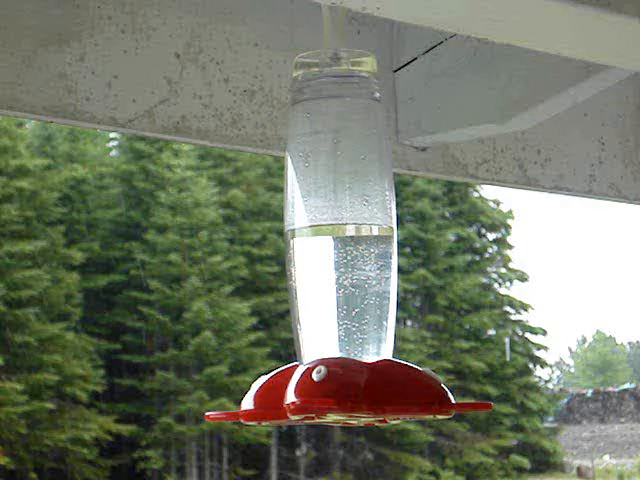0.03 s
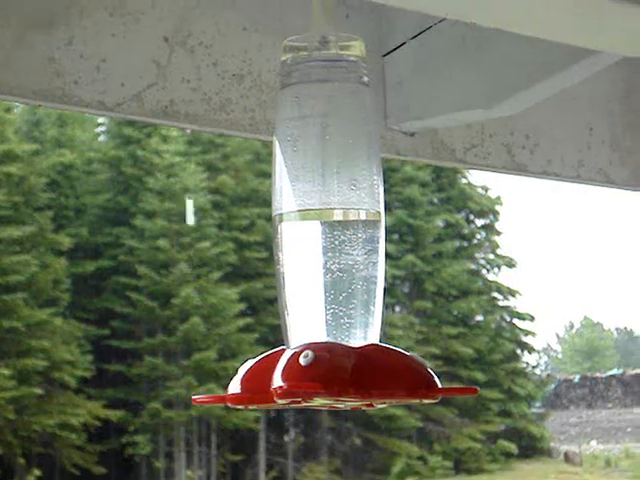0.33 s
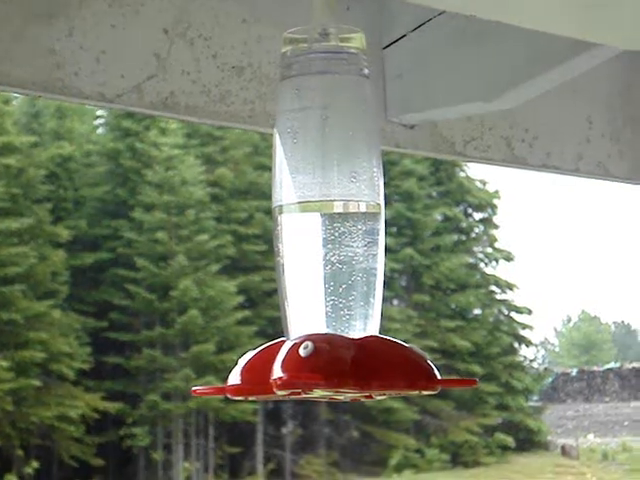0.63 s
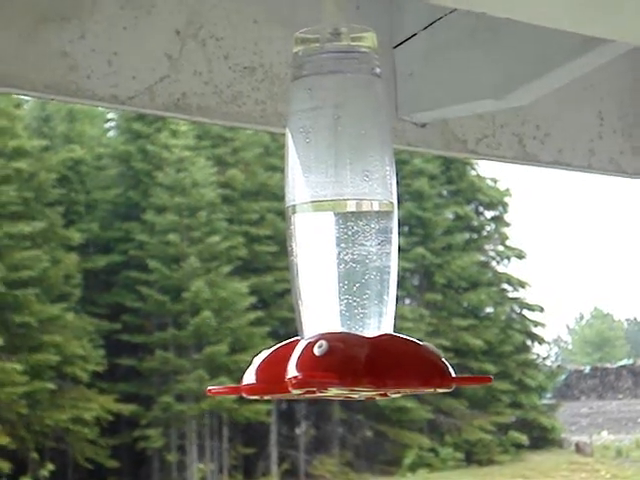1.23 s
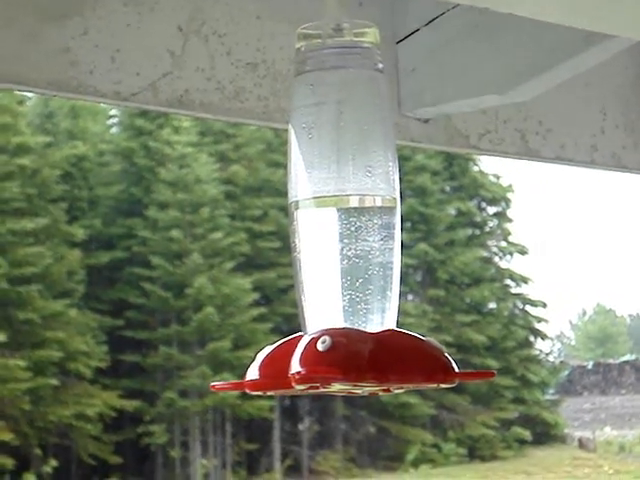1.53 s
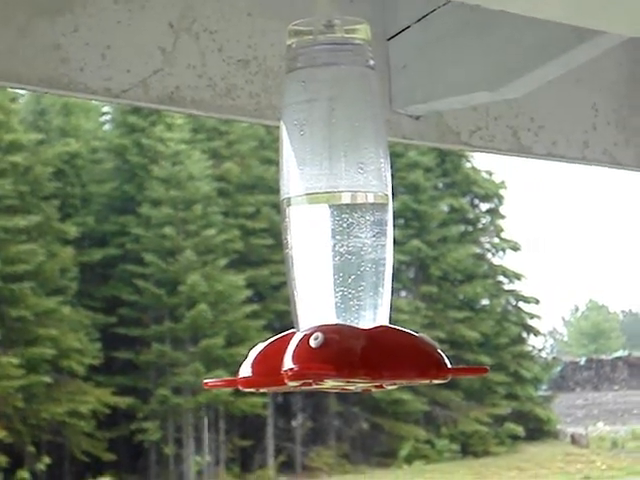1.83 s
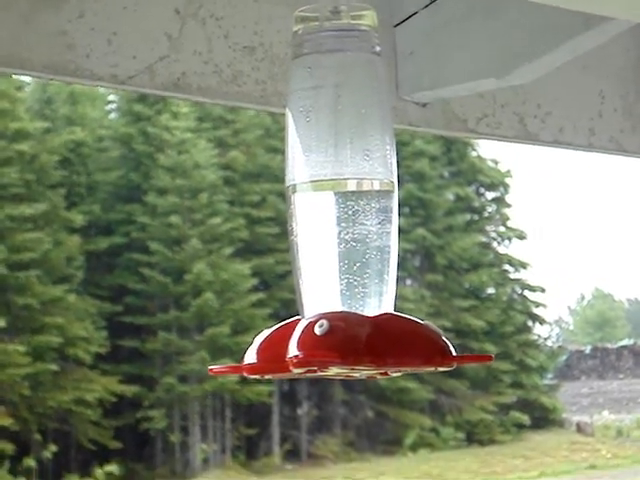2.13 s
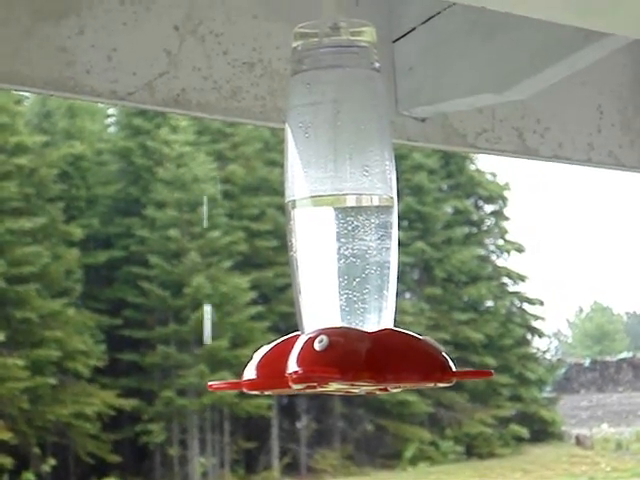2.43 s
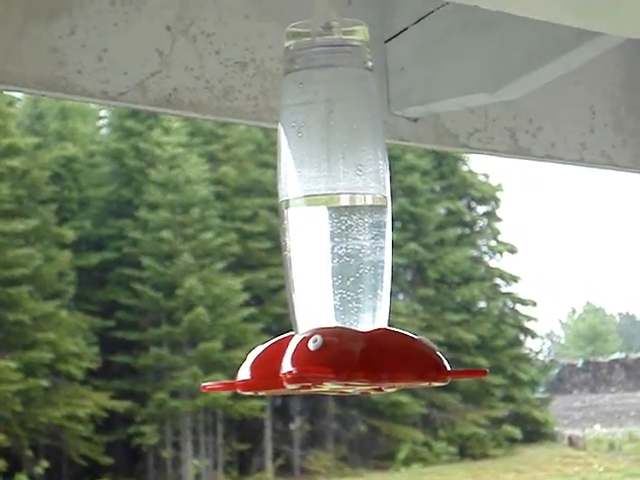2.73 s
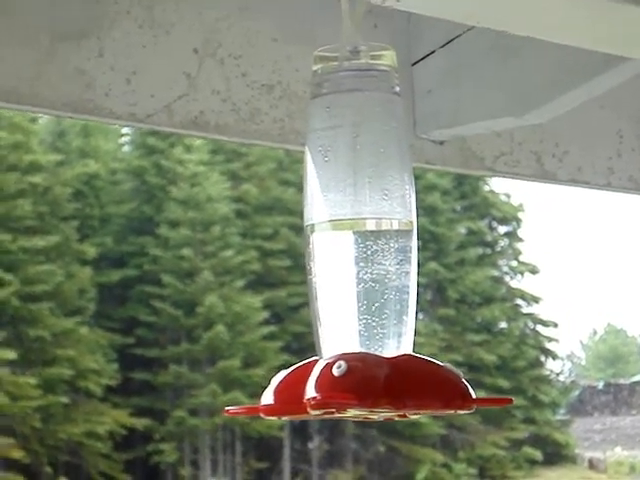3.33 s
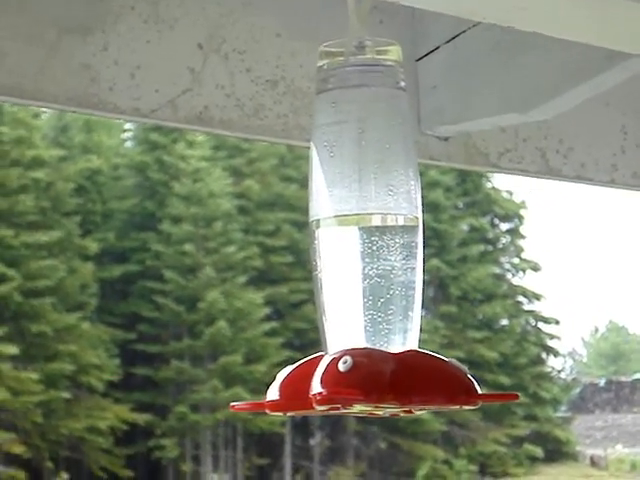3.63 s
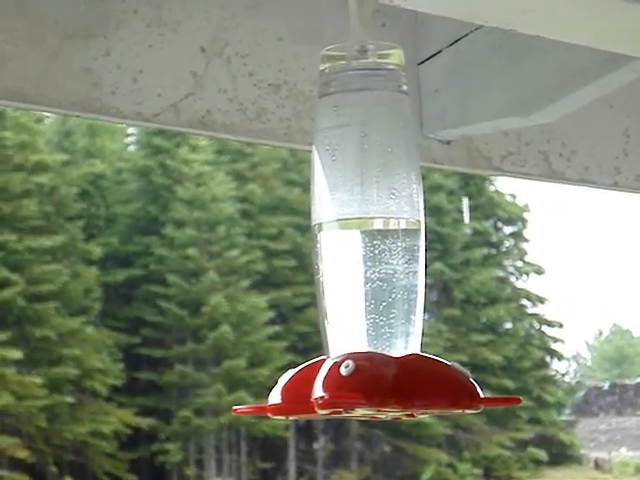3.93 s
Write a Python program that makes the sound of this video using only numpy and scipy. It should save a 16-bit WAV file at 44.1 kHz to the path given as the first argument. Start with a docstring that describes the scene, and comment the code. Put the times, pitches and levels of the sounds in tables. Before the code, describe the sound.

Steady light rain with drops splashing from the eaves and high, thin birdsong behind.

```python
"""Light rain from a porch

Rain washes over a conifer wood. Drops from the eaves splash on the ground and plink in water,
and one ticks on something hard close by. A high buzzing song, probably a bird, rises among the
trees at the start; thin whistles follow. A hand knocks lightly on a camera as the sound opens."""
import sys
import numpy as np
from scipy import signal
from scipy.fft import rfft, irfft
from scipy.io import wavfile
from scipy.ndimage import uniform_filter1d

SR = 44100
rng = np.random.default_rng(int(sys.argv[2]) if len(sys.argv) > 2 else 0)


def put_to_file(sound):
    """Save the sound as 16-bit audio at rate SR, in the file named by the first command-line argument."""
    columns = np.atleast_2d(sound).T  # one column per channel
    safe = np.clip(columns, -1, 1)
    whole_steps = np.round(safe * 32767)
    wavfile.write(sys.argv[1], SR, whole_steps.astype(np.int16))


N = 176400

# Tone of the rain wash. Each row: frequency in Hz, relative level in dB.
RAIN_EQ = [(15, -62), (25, -12.5), (200, -1.5), (270, -1), (301, -1), (476, -2), (840, -2.5), (988, -4.5),
           (2350, -7.5), (5000, -10), (5430, -9.5), (6050, -9.5), (8140, -9), (9840, -17.5), (10700, -41.5),
           (14800, -34.5), (16000, -31)]
# Splashes under the eaves. Each row: start in seconds, then body, spray and slap in relative dB.
SPLASH_HITS = [(0.308, -45.5, -51, -68), (0.469, -48, -53.5, -51.5), (0.835, -52.5, -59, -71),
               (1.0056, -48, -46.5, -53), (1.213, -55, -55, -50.5), (1.453, -74, -54.5, -63),
               (1.613, -53, -52.5, -64), (1.6904, -47.5, -49.5, -54), (1.772, -54, -56, -52),
               (2.256, -58, -51, -66), (2.378, -58, -46.5, -69), (2.661, -56, -48.5, -65),
               (3.058, -52.5, -48, -70), (3.262, -51.5, -51, -55), (3.423, -51.5, -58, -54),
               (3.579, -56, -50, -56), (3.593, -64, -52, -72), (3.7506, -49.5, -49.5, -53)]
# A splash's mid body, bright spray and low slap. Each row: frequency in Hz, relative level in dB.
BODY_EQ = [(700, -29), (1800, -7), (3400, -0.5), (5200, -4.5), (9000, -20)]
SPRAY_EQ = [(2500, -42), (5500, 2), (7900, 10), (9400, 1.5), (10400, -12), (15500, -32)]
SLAP_EQ = [(60, -7), (300, 1), (700, -7), (1600, -16), (3000, -32)]
# Drops landing in water. Each row: start in seconds, starting pitch in Hz, peak level in dB.
PLINK_HITS = [(1.213, 1650, -42), (1.618, 6500, -38.5), (1.693, 8230, -40), (2.545, 1660, -39),
              (3.4236, 3380, -38), (3.753, 3440, -42.5)]
# Modes of the hard surface. Each row: frequency in Hz, relative level in dB, T60 in seconds.
SURFACE_MODES = [(1130, -4.5, 0.012), (1600, -7.5, 0.02), (2155, -15, 0.023), (2620, 2, 0.012),
                 (3210, 1.5, 0.0058), (4090, -2, 0.011), (5060, -5.5, 0.006), (5600, -22, .008),
                 (7050, -23, 0.015), (9000, -15, 0.018), (11270, -27, .007), (14500, -13, .007)]
# Contour of the buzzing song. Each row: time in seconds, pitch in Hz, level in dB.
SONG_CONTOUR = [(.12, 4400, -44.5), (0.251, 4370, -41.5), (.295, 5163, -41), (0.357, 5300, -46.5),
                (0.403, 4370, -46.5), (0.471, 4367, -42), (.535, 4990, -42.5), (.595, 5540, -39.5),
                (0.654, 5986, -40), (0.762, 6020, -44), (.84, 6100, -52.5), (0.919, 6050, -52),
                (1.031, 5900, -76)]
# Fizz around the song. Each row: frequency in Hz, relative level in dB.
FIZZ_EQ = [(3000, -2), (5000, 12.5), (8500, -7), (10700, -6), (12000, -8), (13500, -5), (16000, -19)]
# Thin whistles. Each row: start and length in seconds, first and last pitch in Hz, level in dB.
WHISTLE_NOTES = [(.15, 0.25, 5450, 5450, -46), (.42, 0.228, 5470, 5620, -48), (2.05, 0.1, 2720, 2680, -63),
                 (2.31, 0.055, 5550, 5500, -56.5), (2.47, 0.088, 5500, 5500, -57.5),
                 (2.591, 0.052, 5550, 5500, -55), (2.715, 0.048, 4750, 4400, -54),
                 (2.795, 0.044, 5600, 5400, -51.5), (2.87, 0.22, 7850, 8530, -55.5),
                 (2.893, 0.13, 5600, 5150, -55.5), (3.017, 0.086, 7400, 6750, -55.5),
                 (3.028, 0.048, 4550, 4380, -55), (3.109, 0.039, 6100, 6050, -52.5),
                 (3.117, 0.062, 5600, 5230, -51.5), (3.246, 0.16, 8000, 8410, -51),
                 (3.435, 0.12, 6750, 6170, -55.5), (3.579, 0.035, 8950, 8700, -51),
                 (3.634, 0.15, 9250, 9400, -59), (3.792, .06, 7100, 6600, -55)]
# Hand knocks. Each row: start in seconds, click level in dB, click brightness in Hz,
# click decay in seconds, thump level in dB.
HAND_KNOCKS = [(0.2656, -30.5, 1490, 0.005, -25.5), (0.2758, -27.5, 1900, 0.0022, -37)]

RAIN_DB, RAIN_SWELL_DB, PATTER_DB = -49, .45, -60.5
SPLASH_ATTACK_S, SPLASH_DECAY_S = 0.0005, 0.015
PLINK_T60_S, PLINK_RISE_PER_S = 0.026, 21
TICK_S, TICK_RING_DB, TICK_CRACK_DB = 3.2074, -20.5, -29
BUZZ_HZ, BUZZ_SWING_HZ, BUZZ_SCATTER_HZ, FIZZ_DB = 114.5, 298, 207.5, -9
WHISTLE_WAVER_HZ, WHISTLE_EDGE_S = 129.6, 0.0051
THUMP_HZ, THUMP_DECAY_S, SHAKE_DB, SHAKE_DECAY_S = 260, 0.0018, -59.5, 0.074
WOOD_T60_S = 0.68
OPEN_S, MIRROR_DB, MIRROR_HZ, TOP_HZ = 0.1682, -18, 19950, 15900


def undb(db):
    """Decibels to gain."""
    return 10 ** (np.asarray(db) / 20)


def unit(x):
    """Scale to rms 1."""
    return x / np.sqrt(np.mean(x ** 2) + 1e-20)


def colour(x, eq):
    """Shape with an EQ curve of (Hz, dB) points, then scale to rms 1."""
    hz, db = np.array(eq, float).T
    f = np.maximum(np.fft.rfftfreq(len(x), 1 / SR), 1)
    gain = undb(np.interp(np.log(f), np.log(hz), db))
    return unit(irfft(rfft(x) * gain, len(x)))


def wander(rate_hz):
    """Smooth random modulation at rms 1."""
    hold = max(int(SR / rate_hz), 1)
    steps = np.repeat(rng.standard_normal(N // hold + 1), hold)
    return unit(uniform_filter1d(uniform_filter1d(steps, hold), hold)[:N])


def droplets(per_s, spread_db, size):
    """Random impacts of uneven strength."""
    hits = (rng.random(size) < per_s / SR) * rng.choice([-1, 1], size)
    return hits * undb(spread_db * np.minimum(rng.exponential(size=size), 5))


def add(out, start, x):
    """Mix a short sound in at its start in seconds."""
    i = max(int(start * SR), 0)
    out[i:i + len(x)] += x[:max(N - i, 0)]


def rain():
    """Far drops blur into a wash that swells and flickers a little; nearer drops patter on top."""
    wash = colour(rng.standard_normal(N), RAIN_EQ)
    wash *= undb(RAIN_DB + RAIN_SWELL_DB * (wander(3.25) + wander(45)))
    patter = colour(droplets(per_s=1200, spread_db=5, size=N),
                    [(100, -33), (400, 2.5), (2000, -9.5), (8300, -3.5), (10400, -9), (16000, -14)])
    return wash + undb(PATTER_DB) * patter


def splashes(size=8192):
    """Each drop from the eaves slaps the ground and bursts into droplets."""
    out, t = np.zeros(N), np.arange(size) / SR
    envelope = (1 - np.exp(-t / SPLASH_ATTACK_S)) * np.exp(-t / SPLASH_DECAY_S)
    for start, *levels in SPLASH_HITS:
        burst = sum(undb(db) * colour(droplets(per_s=4200, spread_db=4.4, size=size), eq)
                    for db, eq in zip(levels, (BODY_EQ, SPRAY_EQ, SLAP_EQ)))
        add(out, start, 1.75 * burst * envelope)
    return out


def plinks(size=4096):
    """Drops land in water, where small bubbles ring and rise in pitch."""
    out, t = np.zeros(N), np.arange(size) / SR
    envelope = np.exp(-np.log(1000) * t / PLINK_T60_S)
    for start, hz, db in PLINK_HITS:
        bubble = np.sin(2 * np.pi * hz * (t + PLINK_RISE_PER_S * t ** 2 / 2))
        add(out, start, undb(db) * bubble * envelope)
    return out


def tick(size=4096):
    """A drop hits something hard and near: a sharp crack and a tightly damped ring."""
    out, t = np.zeros(N), np.arange(size) / SR
    ring = sum((-1) ** k * undb(db) * np.sin(2 * np.pi * hz * t) * np.exp(-np.log(1000) * t / t60)
               for k, (hz, db, t60) in enumerate(SURFACE_MODES))
    crack = colour(rng.standard_normal(size), [(600, -22), (1200, 3), (5000, 4), (15000, -19)])
    crack *= np.exp(-t / 0.0021)
    low_cut = signal.butter(3, 850, "high", fs=SR, output="sos")
    add(out, TICK_S, signal.sosfilt(low_cut, undb(TICK_RING_DB) * ring + undb(TICK_CRACK_DB) * crack))
    return out


def song(t):
    """A high tone swept rapidly up and down with a faint fizz, smeared to a hiss by the trees."""
    times, hz, db = np.array(SONG_CONTOUR).T
    buzz = np.sin(2 * np.pi * np.cumsum(BUZZ_HZ * (1 + 0.17 * wander(40))) / SR)
    pitch = np.interp(t, times, hz) + BUZZ_SWING_HZ * buzz + BUZZ_SCATTER_HZ * wander(1500)
    tone = np.sqrt(2) * np.sin(2 * np.pi * np.cumsum(pitch) / SR)
    fizz = undb(FIZZ_DB) * colour(rng.standard_normal(N), FIZZ_EQ)
    envelope = undb(np.interp(t, times, db, left=-120, right=-120) + 1.4 * wander(150))
    return wood_reverb((tone + fizz) * envelope, wet_db=5)


def whistles():
    """Faint bird notes waver and glide among the trees."""
    out, waver = np.zeros(N), WHISTLE_WAVER_HZ * wander(500)
    for start, length, first_hz, last_hz, db in WHISTLE_NOTES:
        t = np.arange(int(length * SR)) / SR
        glide = first_hz + (last_hz - first_hz) * t / length
        pitch = glide + np.roll(waver, -int(start * SR))[:len(t)]
        tone = np.sqrt(2) * np.sin(2 * np.pi * np.cumsum(pitch) / SR)
        envelope = np.clip(np.minimum(t, length - t) / WHISTLE_EDGE_S, 0, 1)
        add(out, start, undb(db) * tone * envelope)
    return wood_reverb(out, wet_db=-2)


def knocks(size=8192):
    """A hand bumps the camera body: a click and a thump, then a brief low shake."""
    out, t = np.zeros(N), np.arange(size) / SR
    for start, click_db, hz, decay, thump_db in HAND_KNOCKS:
        click_eq = [(100, -3), (900, -5), (hz, 0), (2 * hz, -7), (16000, -36)]
        click = colour(rng.standard_normal(size), click_eq) * np.exp(-t / decay)
        thump = np.sin(2 * np.pi * THUMP_HZ * t) * np.exp(-t / THUMP_DECAY_S)
        shake_eq = [(20, -7), (70, 7), (160, -10), (500, -35), (4000, -80)]
        shake = colour(rng.standard_normal(size), shake_eq) * np.exp(-t / SHAKE_DECAY_S)
        add(out, start, undb(click_db) * click + undb(thump_db) * thump + undb(SHAKE_DB) * shake)
    return out


def wood_reverb(x, wet_db):
    """Trunks scatter a dense tail behind the direct sound."""
    t = np.arange(SR) / SR
    tail = rng.standard_normal(SR) * np.exp(-np.log(1000) * t / WOOD_T60_S)
    scatter = signal.fftconvolve(x, tail / np.linalg.norm(tail))[:N]
    wet = undb(wet_db)
    return (x + wet * scatter) / np.hypot(1, wet)


def scene():
    """Rain, birds, drips and handling in a mono mix."""
    t = np.arange(N) / SR
    return (rain() + song(t) + whistles() + splashes() + plinks() + tick() + knocks())[None]


def record(dry):
    """Open after a beat of silence, add a faint mirror image of the treble and cut the top."""
    t = np.arange(N) / SR
    treble = signal.sosfilt(signal.butter(3, [4000, 9500], "band", fs=SR, output="sos"), dry)
    mirror = 2 * undb(MIRROR_DB) * treble * np.cos(2 * np.pi * MIRROR_HZ * t)
    fade_in = np.clip((t - OPEN_S) / 0.0072, 0, 1)
    high_cut = signal.ellip(10, .2, 70, TOP_HZ, fs=SR, output="sos")
    return signal.sosfilt(high_cut, (dry + mirror) * fade_in)


dry = scene()
out = record(dry)
put_to_file(out)
```